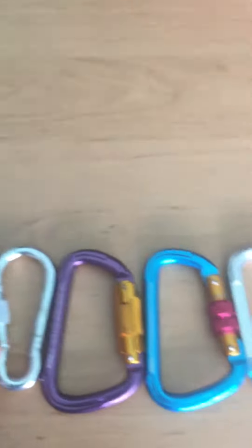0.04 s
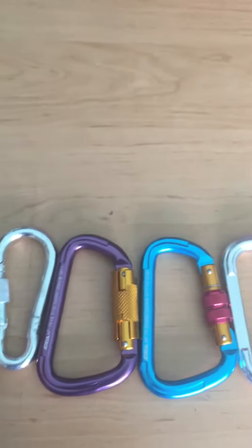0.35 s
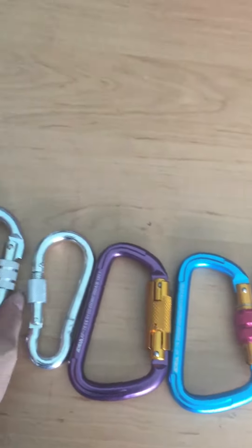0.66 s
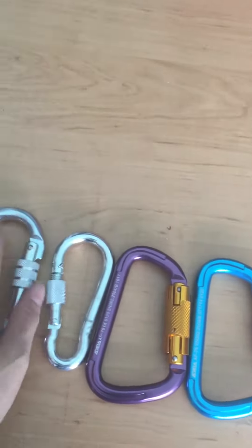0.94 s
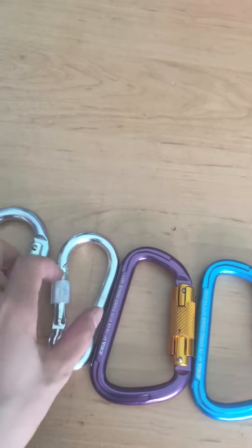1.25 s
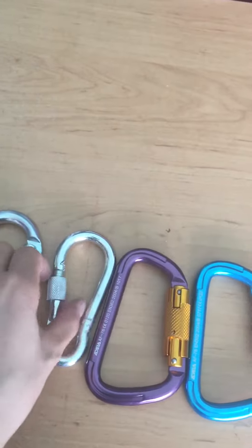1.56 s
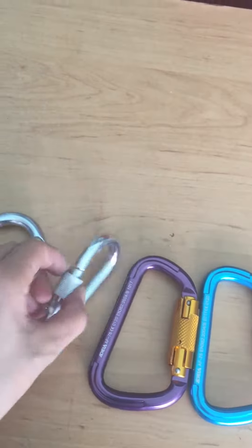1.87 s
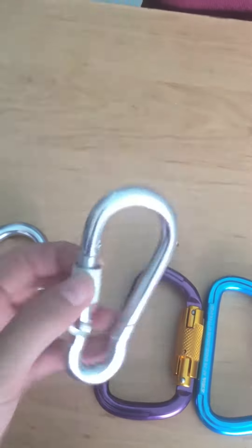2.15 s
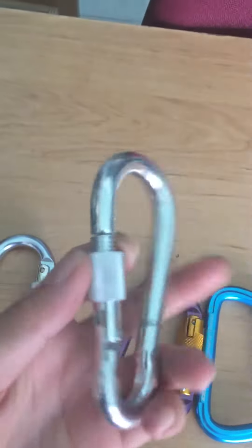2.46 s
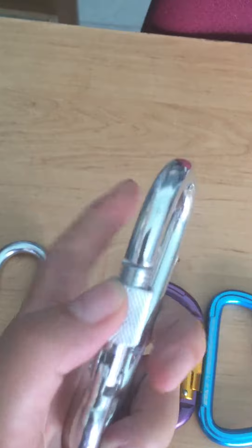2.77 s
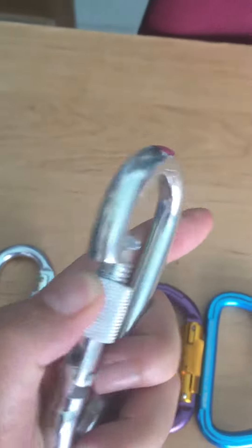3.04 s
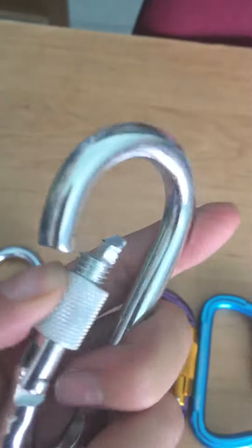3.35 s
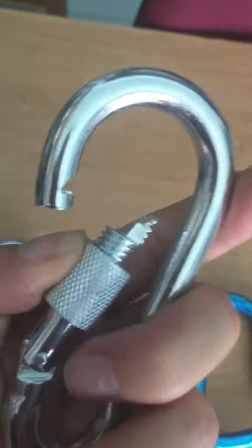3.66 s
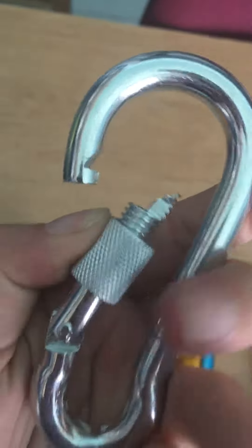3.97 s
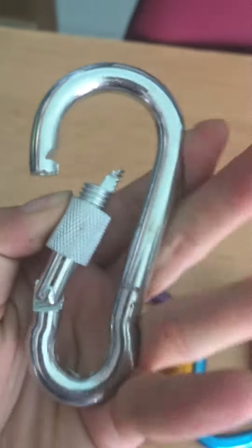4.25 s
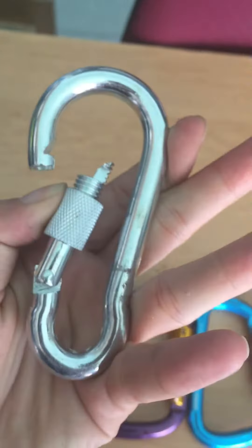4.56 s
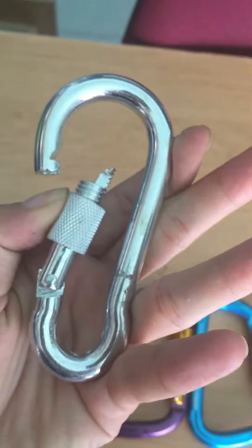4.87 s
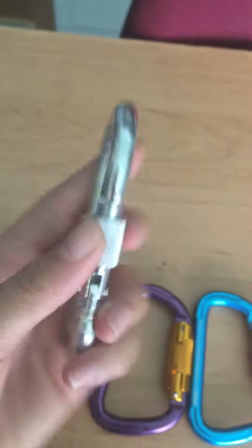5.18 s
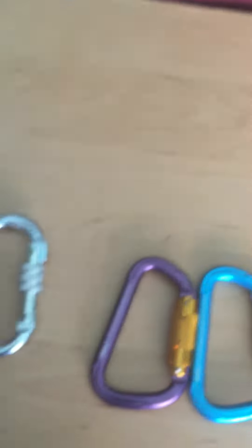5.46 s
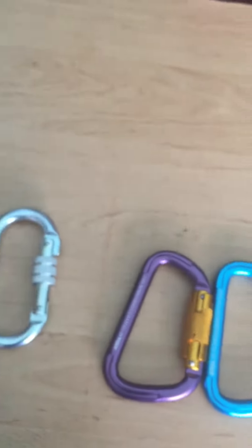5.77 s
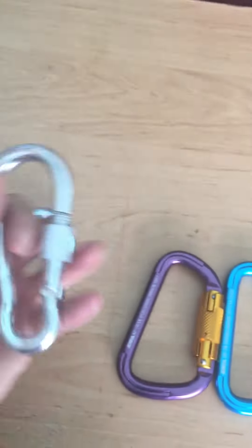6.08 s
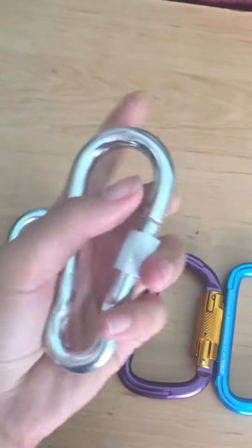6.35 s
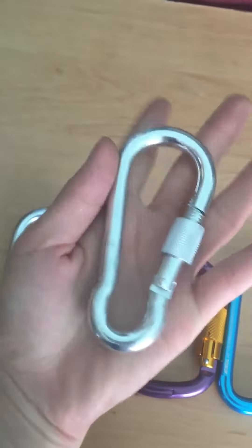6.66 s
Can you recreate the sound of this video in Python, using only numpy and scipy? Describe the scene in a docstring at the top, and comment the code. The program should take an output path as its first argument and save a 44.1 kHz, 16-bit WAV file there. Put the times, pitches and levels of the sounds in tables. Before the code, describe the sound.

Steel carabiners clink and scrape on a wooden desk, a gate clicks open and snaps shut, then a thud, over a low engine hum.

```python
"""Carabiners on a wooden desk

An engine idles outside a small room. Inside, a steel carabiner is put down and the desk thuds.
Another is dragged, juddering as it sticks and slips on the wood. It clinks against its neighbours
and is picked up. Its sprung gate clicks open and snaps shut, it is dropped on the desk,
and fingers slide over the next one with a soft hiss."""
import sys
import numpy as np
from scipy import signal
from scipy.fft import rfft, irfft
from scipy.io import wavfile
from scipy.ndimage import uniform_filter1d

SR = 44100
rng = np.random.default_rng(int(sys.argv[2]) if len(sys.argv) > 2 else 0)


def int16_out(signal):
    """Quantize to a 16-bit WAV file."""
    q = np.round(np.clip(np.atleast_2d(signal).T, -1, 1) * 32767)
    wavfile.write(sys.argv[1], SR, q.astype(np.int16))


N = 300762
TIME = np.arange(N) / SR
AGE = TIME[:SR // 2]  # seconds since a hit


def from_db(db):
    """Turn decibels into a gain."""
    return 10 ** (np.asarray(db) / 20)


def unit_power(x):
    """Scale a signal to an average power of 1."""
    return x / np.sqrt(np.mean(x ** 2) + 1e-20)


def at_hz(points, hz):
    """Read between the rows of a (frequency, value) table on a log-frequency scale."""
    known_hz, values = np.transpose(points)
    return np.interp(np.log(hz + 1e-9), np.log(known_hz), values)


def noise(colour, size=N):
    """Noise shaped by a (frequency, level) table, fading away beyond the table's ends."""
    hz = np.arange(size // 2 + 1) * SR / size + 1e-3
    ends = 1 / np.sqrt((1 + (.8 * colour[0][0] / hz) ** 8) * (1 + (.8 * hz / colour[-1][0]) ** 8))
    white = rfft(rng.standard_normal(size))
    return unit_power(irfft(white * from_db(at_hz(colour, hz)) * ends, size))


def drift(rate_hz):
    """A random wobble of typical size 1 that heads for a new value rate_hz times a second."""
    return unit_power(np.interp(TIME * rate_hz, np.arange(20000), rng.standard_normal(20000)))


def shimmer(x, depth_db, patch_s, size=2048):
    """Let narrow frequency bands swell and sink, each on its own."""
    spectrum = signal.stft(x, nperseg=size)[2]
    memory = np.exp(-size / 2 / SR / patch_s)
    swell = unit_power(signal.lfilter([1], [1, -memory], rng.standard_normal(spectrum.shape)))
    return unit_power(signal.istft(spectrum * from_db(depth_db * swell), nperseg=size)[1][:N])


def fade(t60):
    """Die away by 60 dB in t60 seconds, the 'fade time' in the tables."""
    return np.exp(-np.log(1000) * AGE / t60)


def shelf(x, corner_hz, treble_db):
    """Turn the treble above the corner up or down."""
    lows = signal.sosfilt(signal.butter(1, corner_hz, fs=SR, output="sos"), x)
    return lows + from_db(treble_db) * (x - lows)


def add(track, s, sound):
    """Mix a sound into the track at s seconds."""
    start = max(round(s * SR), 0)
    track[start:start + len(sound)] += sound[:N - start]


def at_level(sound, db):
    """Scale a sound so that its loudest three milliseconds have this level."""
    return sound * from_db(db) / np.sqrt(uniform_filter1d(sound ** 2, 132).max())


def struck(tones, colour, noise_db, noise_t60, rise_s):
    """One hit: an object rings at its own tones over a short burst of noisy vibration."""
    phases = rng.uniform(0, 2 * np.pi, len(tones))
    rings = sum(from_db(db) * fade(t60) * np.sin(2 * np.pi * hz * AGE + phase)
                for (hz, db, t60), phase in zip(tones, phases))
    burst = from_db(noise_db) * fade(noise_t60) * noise(colour, size=len(AGE))
    return (rings + burst) * (1 - np.exp(-AGE / rise_s))


# the room's rumble and the street's wash of noise: (frequency [Hz], relative level [dB])
RUMBLE_COLOUR = [(35, -5.5), (60, -1.5), (120, -1.5), (160, -7), (270, -9), (325, -20), (470, -30.5),
                 (555, -22.5), (700, -30), (1400, -28.5), (2500, -28.5), (5000, -39), (9000, -46.5),
                 (16000, -52)]
STREET_COLOUR = [(450, -9), (600, -2.5), (850, -8), (1250, -4), (2500, -13), (4500, -31), (9000, -40)]
def background(rumble_db=-45.5, street_db=-50, closest_s=2.93, pass_width_s=.46):
    """The room rumbles steadily; street noise swells and recedes as something passes."""
    rumble = from_db(rumble_db) * shimmer(noise(RUMBLE_COLOUR), depth_db=5, patch_s=0.041)
    distance = np.hypot(1, (TIME - closest_s) / pass_width_s)
    street = from_db(street_db) / distance * shimmer(noise(STREET_COLOUR), depth_db=6.5, patch_s=0.057)
    return rumble + street


# the engine's tones: (multiple of the firing rate, relative level [dB])
ENGINE_TONES = [(3, -17), (4, -4.5), (6, 4), (7, 1), (9, -14.5), (11, -13.5), (12, -12), (13, -14.5),
                (15, -11)]
def engine(firing_hz=18.5, idle_db=-54.5, rise_db_per_s=0.57, swell_db=12.5, swell_width_s=1.58):
    """Firing pulses throb through the wall, which passes only low tones; the throb swells once."""
    phase = 2 * np.pi * np.cumsum(firing_hz * (1 + .004 * drift(2))) / SR
    strongest = max(ENGINE_TONES, key=lambda tone: tone[1])[0]
    throb = 0
    for multiple, db in ENGINE_TONES:
        peak_s = 3.73 - 0.76 * np.log2(multiple / strongest)  # higher tones swell first
        lift_db = swell_db * np.exp(-((TIME - peak_s) / swell_width_s) ** 2)
        throb += from_db(db + lift_db + drift(5)) * np.cos(multiple * phase + .15 * drift(6))
    return from_db(idle_db + rise_db_per_s * TIME) * throb


# how long the room echoes: (frequency [Hz], fade time [s])
ROOM_FADES = [(200, 0.48), (1500, 0.316), (4000, 0.4), (8000, 0.33), (15000, 0.25)]
def room(x, build_up_s=0.0078):
    """Echoes from the walls blend into a short tail; the highest treble dies first."""
    edges_hz = np.geomspace(80, 18000, 9)
    tail = 0
    for low, high in zip(edges_hz, edges_hz[1:]):
        band_pass = signal.butter(2, [low, high], "band", fs=SR, output="sos")
        band = signal.sosfilt(band_pass, rng.standard_normal(len(AGE)))
        tail += band * fade(at_hz(ROOM_FADES, np.sqrt(low * high)))
    tail *= np.clip(AGE / build_up_s, 0, 1) ** 2
    return signal.fftconvolve(x, tail / np.sqrt(np.sum(tail ** 2)))[:N]


def scatter(x, share):
    """The walls get the steel's sound from every side at once, which blurs its peaks."""
    return np.sqrt(1 - share) * x + np.sqrt(share) * x * np.sign(drift(2000))


# finger strokes: (start [s], length [s], level [dB])
STROKES = [(1.953, 0.11, -51), (2.212, 0.17, -53), (2.473, 0.14, -53), (3.065, 0.21, -52),
           (3.385, 0.63, -57), (4.28, 0.34, -54.5), (4.714, 0.08, -54), (4.763, 0.61, -61.5),
           (6.467, 0.27, -50.5), (6.566, 0.37, -53)]
# the hiss of skin on steel: (frequency [Hz], relative level [dB])
SKIN_COLOUR = [(2400, -3), (3500, 0), (4500, -11), (5400, -11), (7000, -13), (9700, -13.5), (16000, -26.5)]
# the steel's tones, muffled by the hand: (frequency [Hz], width [Hz], relative level [dB])
HELD_TONES = [(2465, 130, -9), (4440, 650, -4.5), (5200, 120, -14)]
def fingers(grain_db=2.5, hiss_db=-2, grip_shift=0.023):
    """Skin slides over steel in short, grainy strokes; the steel's tones shift with the grip."""
    pressure = np.zeros(N)
    for s, length, db in STROKES:
        progress = np.linspace(0, 1, int(length * SR))
        stroke = progress ** 0.21 * (1 - progress) ** 2.2  # starts fast, trails off
        add(pressure, s, from_db(db) * stroke / stroke.max())
    friction = from_db(hiss_db) * shimmer(noise(SKIN_COLOUR), depth_db=6.5, patch_s=0.04)
    grip = 1 + grip_shift * drift(14)
    for hz, width_hz, db in HELD_TONES:
        tone = np.exp(2j * np.pi * np.cumsum(hz * grip) / SR)
        blur = drift(width_hz) + 1j * drift(width_hz)  # spreads the tone into a band of noise
        friction += from_db(db) * np.real(blur * tone)
    return pressure * from_db(grain_db * drift(400)) * friction


# steel squeaks as it lifts off: (start [s], length [s], first pitch [Hz], last pitch [Hz], level [dB])
SQUEAKS = [(1.956, 0.054, 2460, 2360, -35.5)]
def squeaks(waver=0.013):
    """Sliding steel sings briefly, sagging in pitch."""
    out = np.zeros(N)
    for s, length, start_hz, end_hz, db in SQUEAKS:
        size = int(length * SR)
        hz = np.linspace(start_hz, end_hz, size) * (1 + waver * drift(240)[:size])
        add(out, s, from_db(db) * np.hanning(size) * np.sin(2 * np.pi * np.cumsum(hz) / SR))
    return out


# steel or a hand scrapes the desk: (start [s], length [s], relative level [dB])
SCRAPES = [(0.96, 0.026, -31.5), (0.999, 0.4, -30.5), (1.684, 0.14, -42), (1.746, 0.055, -38),
           (2.711, 0.055, -42.5)]
def scrape_gain(attack_s=0.008, sag_db_per_s=4.5, release_db_per_s=141):
    """How loud the scraping is: each scrape sets in quickly, eases off and dies away."""
    gain = np.zeros(N)
    for start, length, db in SCRAPES:
        age = np.maximum(TIME - start, 0)
        drop_db = sag_db_per_s * age + release_db_per_s * np.maximum(age - length, 0)
        gain += np.minimum(age / attack_s, 1) * from_db(db - drop_db)
    return gain


# the steel slips forward: (time [s], relative level [dB], rasp compared with the jolt [dB])
SLIPS = [(0.991, -8.5, -19.5), (1.037, -15.5, -18), (1.047, -16, -15.5), (1.08, -10.5, -18),
         (1.124, -15, -20), (1.162, -12, -21.5), (1.199, -17, -30), (1.233, -29, -26), (1.267, -18, -26),
         (1.298, -18.5, -40), (1.329, -25, -30), (1.36, -18.5, -24.5), (1.414, -31, -38),
         (1.7707, -19.5, -23.5), (1.826, -25, -10)]
# tones that dragging stirs in the desk: (frequency [Hz], relative level [dB], fade time [s])
DRAG_TONES = [(244, 4.5, 0.17), (388, -5, 0.095), (663, 8.5, 0.087), (1043, 4.5, 0.12), (1188, 11.5, 0.038),
              (1299, 9, 0.046), (1600, 5.5, 0.06)]
# friction noise of the wood and rasp of the steel: (frequency [Hz], relative level [dB])
DRAG_COLOUR = [(150, -6.5), (240, 1), (310, -5), (385, 0), (470, -9.5), (560, -10), (665, -2), (810, -8.5),
               (1200, -10), (2000, -18.5), (3300, -29.5), (7200, -48.5), (16000, -64.5)]
RASP_COLOUR = [(3000, 1.5), (7300, -9.5), (9000, -8.5), (10500, -13), (15000, -21)]
def drag(slip_db=-8.5, scrape_db=-2, grain_db=3, stick_db=-7, stick_s=0.0064, ping_hz=8900, ping_db=-45):
    """Scraping stalls as the steel sticks; each slip then jolts the desk, rasps and pings the steel."""
    out, stuck = np.zeros(N), np.zeros(N)
    rasp_shape = fade(.045) * (1 - fade(.012))
    ping_shape = fade(.013) * (1 - fade(.01))
    for s, db, rasp_db in SLIPS:
        jolt = struck(DRAG_TONES, DRAG_COLOUR, noise_db=16, noise_t60=0.067, rise_s=0.00064)
        add(out, s, at_level(jolt, db + slip_db))
        rasp = rasp_shape * noise(RASP_COLOUR, size=len(AGE))
        add(out, s, at_level(rasp, db + slip_db + rasp_db))
        hz = ping_hz * (1 + 0.011 * rng.standard_normal())
        add(out, s, from_db(ping_db) * ping_shape * np.sin(2 * np.pi * hz * AGE))
        stuck += np.maximum(1 - np.abs((TIME - s) / stick_s + 1), 0)  # peaks just before the slip
    judder = from_db(scrape_db + stick_db * stuck + grain_db * drift(200))
    return out + scrape_gain() * judder * noise(DRAG_COLOUR)


# blows on the desk: (time [s], relative level [dB], treble [dB])
KNOCKS = [(0.141, -39.5, -10), (0.316, -38.5, -6), (0.366, -17.5, -38.5), (0.382, -28.5, -15),
          (1.632, -38, -2.5), (1.673, -29, -20), (1.79, -28, -25), (1.9128, -26.5, -8.5), (5.654, -6.5, -3),
          (5.811, -26.5, -10)]
# the desk's tones: (frequency [Hz], relative level [dB], fade time [s])
DESK_TONES = [(275, -1.5, 0.09), (395, 4.5, 0.084), (570, -3.5, 0.17), (652.5, -1.5, 0.12),
              (740, -0.5, 0.12), (915, -5.5, 0.11), (1135, 0, .12), (1288, -0.5, 0.13), (1400, 16, 0.018),
              (1667, 0, .11), (1936, -3.5, 0.15)]
# its short thud and lingering rattle: (frequency [Hz], relative level [dB])
THUD_COLOUR = [(130, -7), (300, -12), (500, -11), (700, -4), (950, -9), (1350, -2.5), (2050, -10.5),
               (2700, -18), (4500, -30), (9000, -37), (16000, -46)]
RATTLE_COLOUR = [(130, -8), (480, -14), (700, -5.5), (950, -6.5), (1350, -3), (2150, -7.5), (2900, -19.5),
                 (9000, -52)]
def knocks(level_db=-3, corner_hz=300, rattle_db=-1, boom_hz=162, boom_db=-17, boom_per_dullness=0.33):
    """The desk thuds and rattles under the steel; heavier, duller landings make the board boom more."""
    out = np.zeros(N)
    boom = fade(0.35) * np.sin(2 * np.pi * boom_hz * AGE) * (1 - fade(0.01002))
    bass_cut = signal.butter(2, 140, "high", fs=SR, output="sos")
    for s, db, treble_db in KNOCKS:
        thud = struck(DESK_TONES, THUD_COLOUR, noise_db=18, noise_t60=.038, rise_s=.0004)
        rattle = from_db(rattle_db) * fade(0.46) * noise(RATTLE_COLOUR, size=len(AGE))
        knock = signal.sosfilt(bass_cut, thud + rattle)
        for _ in range(2):  # two half steps give a steeper slope
            knock = shelf(knock, corner_hz, treble_db / 2)
        board = from_db(db + boom_db - boom_per_dullness * treble_db) * boom
        add(out, s, at_level(knock, db + level_db) + board)
    return out


# steel hits steel: (time [s], relative level [dB], treble [dB],
# first ring [Hz], its relative level [dB], second ring [Hz], its relative level [dB])
CLINKS = [(0.365, -1, 0.5, 9000, -2, 11100, -2), (0.382, -13.5, 1.5, 8660, -8, 6200, -6.5),
          (1.632, -24, -20, 2620, 4.5, 5240, 0.5), (1.6703, -11.5, -5.5, 2680, -2.5, 15400, 5),
          (1.77, -22, -15.5, 5760, 11, 2810, -2), (1.79, -7, -6, 9800, -4.5, 5170, -10),
          (2.7545, -34.5, -14, 5220, 4, 7100, 0), (5.359, -34.5, -3, 5500, 7.5, 7370, 5),
          (5.654, -16.5, -10, 9000, -2.5, 6400, -21), (6.477, -33, -9, 5450, 9, 3380, 6),
          (6.7176, -20.5, -14, 6600, 14.5, 12100, -3.5)]
# the frame's tones, muffled by hand or desk: (frequency [Hz], relative level [dB], fade time [s])
FRAME_TONES = [(2415, -9.5, 0.039), (3010, 0.5, 0.01342), (4260, -7, .01), (6105, -13, 0.0064),
               (8850, 1, 0.011), (11500, -4, 0.0097), (14990, -16.5, 0.0069)]
# the crack of steel on steel, also heard in the gate: (frequency [Hz], relative level [dB])
CRACK_COLOUR = [(250, -12.5), (1200, -19.5), (2200, -12.5), (3500, 1.5), (6000, 2.5), (9000, -1.5),
                (16000, -4.5)]
def clinks(level_db=-6, ring_db=6.5, ring_t60=0.015, detune=0.022):
    """Each pair of frames rings its own way; where they touch sets the brightness and two rings."""
    out = np.zeros(N)
    for s, db, treble_db, first_hz, first_db, second_hz, second_db in CLINKS:
        tuning = 1 + detune * rng.uniform(-1.1, 1)
        tones = [(hz * tuning, tone_db, t60) for hz, tone_db, t60 in FRAME_TONES]
        tones += [(first_hz, ring_db + first_db, ring_t60), (second_hz, ring_db + second_db, ring_t60)]
        clink = struck(tones, CRACK_COLOUR, noise_db=8, noise_t60=0.012, rise_s=0.0001)
        add(out, s, at_level(shelf(clink, 7400, treble_db), db + level_db))
    return out


# the gate's tones as it opens and as it shuts: (frequency [Hz], relative level [dB], fade time [s])
OPENING_TONES = [(3440, -7.5, 0.011), (4880, -3.5, 0.0078), (5480, 1, 0.0045), (6990, -5.5, 0.014),
                 (7440, -7, 0.017), (7430, -48, .3), (11500, -6, 0.0055), (12800, -5, 0.0052),
                 (15500, -7, 0.005)]
SHUTTING_TONES = [(2600, -15, 0.018), (3764, 0.5, 0.0086), (4870, -3, 0.008), (5930, -4, 0.0095),
                  (7950, -5.5, 0.012), (8530, -2, 0.011), (10960, -14, 0.012), (12450, 3.5, 0.02),
                  (15200, 4.5, 0.01)]
def gate(open_s=3.5521, open_db=-11.5, shut_s=5.0324, shut_db=-8, graze_gap_s=.0036, bounce_gap_s=.014):
    """The sprung gate clicks out of its notch; later it grazes the frame, slams home and bounces."""
    out = np.zeros(N)
    click = struck(OPENING_TONES, CRACK_COLOUR, noise_db=-10, noise_t60=0.0075, rise_s=0.00114)
    add(out, open_s, at_level(click, open_db))
    # each contact: (delay [s], level compared with the slam [dB], treble [dB])
    grazes = [(-k * graze_gap_s, -15 - (k - 1) * 9.5, -17) for k in (1, 2, 3)]
    slam = [(0.00013, 0, 0)]
    bounces = [(k * bounce_gap_s, -25.5 - (k - 1) * 2.5, 0) for k in (1, 2)]
    for delay, db, treble_db in grazes + slam + bounces:
        snap = struck(SHUTTING_TONES, CRACK_COLOUR, noise_db=3, noise_t60=0.018, rise_s=0.000218)
        add(out, shut_s + delay, at_level(shelf(snap, 3500, treble_db), db + shut_db))
    return out


# the steel's echo, weakest when it is held nearest the microphone: (time [s], relative level [dB])
STEEL_ECHO = [(.4, -15.5), (1.65, -8), (1.85, -18.5), (3.55, -21.5), (5.03, -20.5), (5.65, -17.5),
              (6.7, -21)]
def scene(desk_echo_db=-13):
    """Mix the handling and its echoes with the engine and the background noise."""
    desk = knocks() + drag() + squeaks()
    steel, spring, skin = clinks(), gate(), fingers()
    to_walls = scatter(steel, share=0.33) + scatter(spring, share=0.45) + skin
    steel_echo_db = np.interp(TIME, *np.transpose(STEEL_ECHO))
    echoes = room(from_db(desk_echo_db) * desk + from_db(steel_echo_db) * to_walls)
    return (desk + steel + spring + skin + echoes + engine() + background())[None]


def record(dry, lowest_hz=32, highest_hz=16100):
    """Remove the deepest bass, round off the loudest peaks and cut the highest treble."""
    thinned = signal.sosfilt(signal.butter(8, lowest_hz, "high", fs=SR, output="sos"), dry)
    rounded = 1.2 * np.tanh(thinned / 1.2)
    return signal.sosfilt(signal.ellip(10, .2, 80, highest_hz, fs=SR, output="sos"), rounded)


dry = scene()
out = record(dry)
int16_out(out)
```